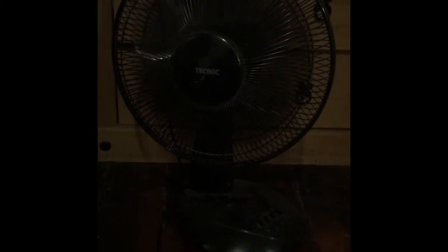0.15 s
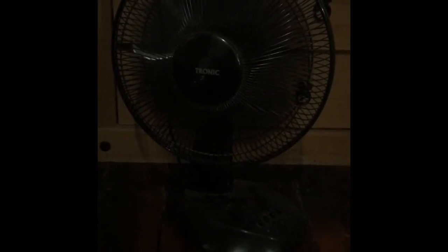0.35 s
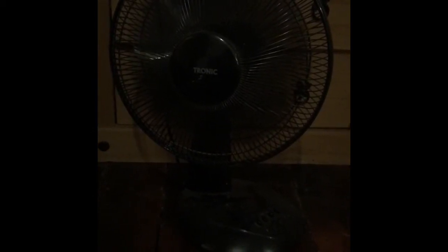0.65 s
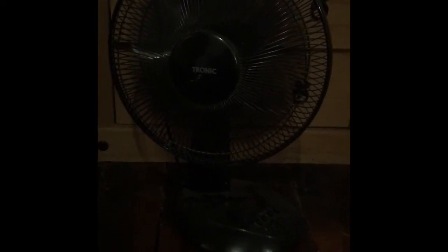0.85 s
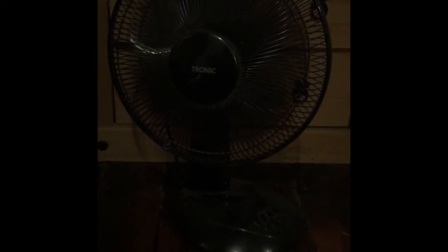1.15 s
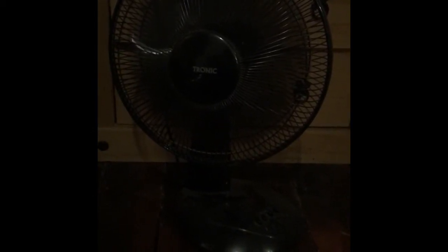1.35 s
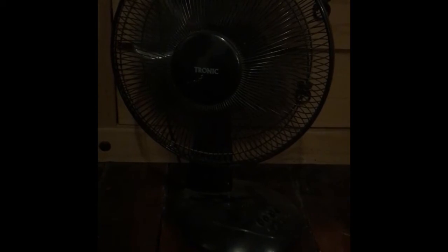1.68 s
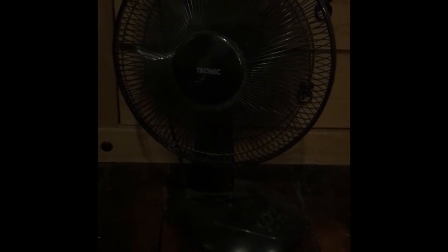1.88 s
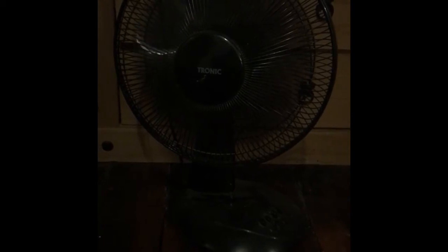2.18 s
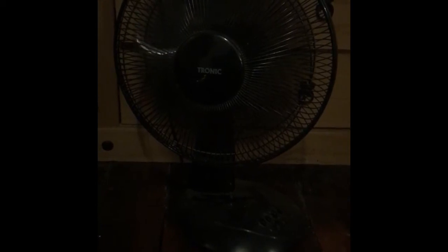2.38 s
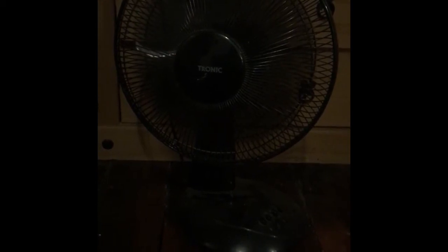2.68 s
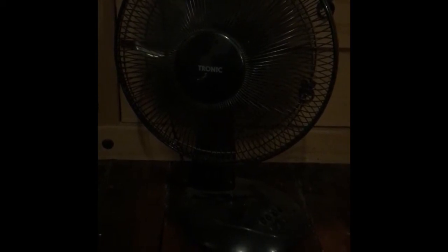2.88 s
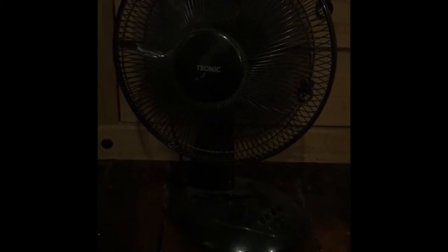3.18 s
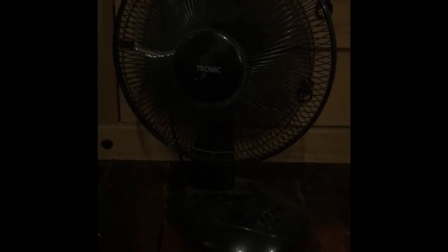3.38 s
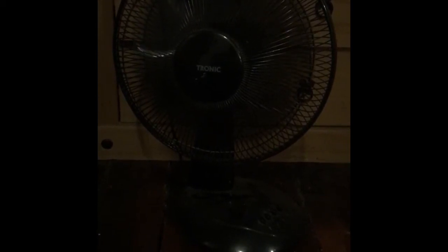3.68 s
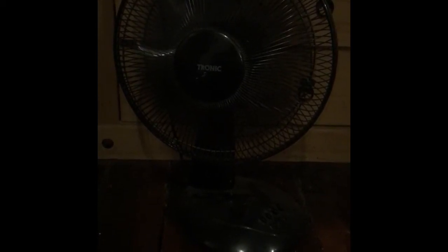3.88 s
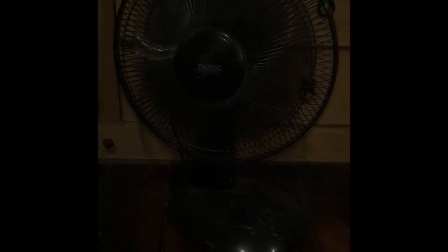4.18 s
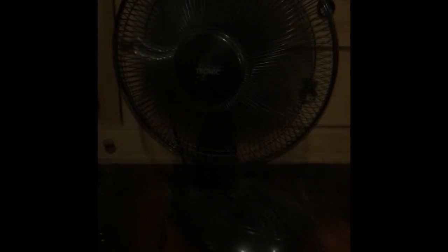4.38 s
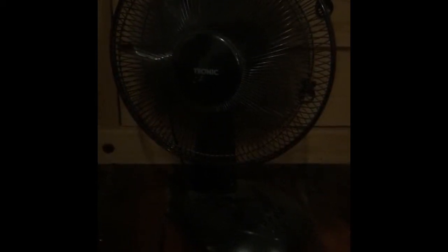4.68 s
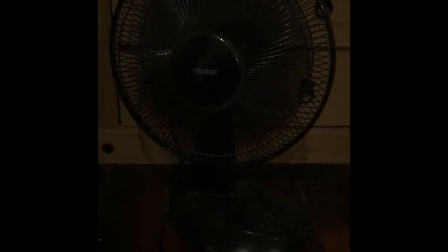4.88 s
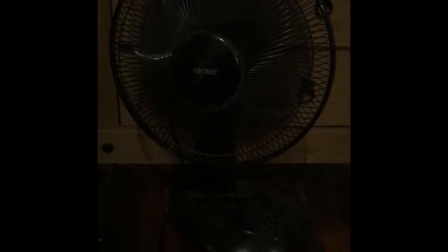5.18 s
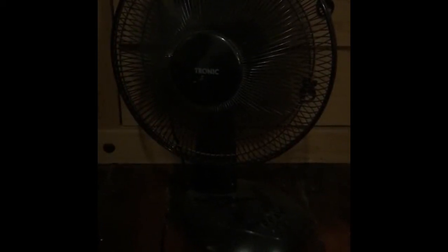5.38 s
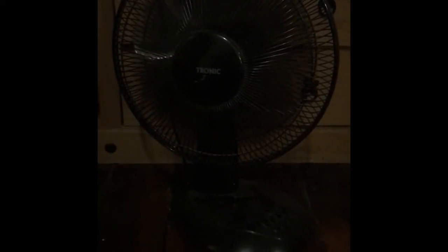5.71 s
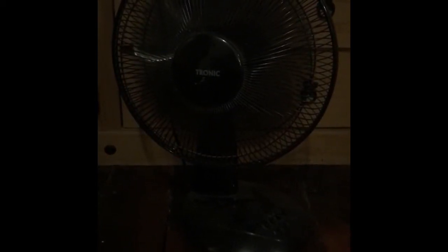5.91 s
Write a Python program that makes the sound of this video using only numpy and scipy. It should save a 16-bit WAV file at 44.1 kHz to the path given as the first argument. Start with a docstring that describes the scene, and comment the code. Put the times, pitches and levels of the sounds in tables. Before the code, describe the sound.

Low wind buffeting with irregular dull thuds dominates a faint steady fan hum and airy whir, with a brief soft rasp past midway.

```python
"""An electric desk fan runs in a quiet room, blowing at the microphone: thumps, rumble, motor hum, blade drone.
Eddies are short pressure swings with noisy fronts and sharp suction pulses; rumble is noise shaped by gusts.
Blades and motor are wavering tones plus a throbbing swish; the grille is a resonant band of noise.
Past midway something rasps faintly, as grainy noise in high resonances, with soft hollow rubs.
Behind lie microphone hiss, a thin electronic whine of harmonics, and tiny ticks of enveloped noise."""
import sys
import numpy as np
from scipy import signal
from scipy.fft import rfft, irfft, next_fast_len
from scipy.io import wavfile
from scipy.ndimage import uniform_filter1d, map_coordinates

SR = 44100
rng = np.random.default_rng(int(sys.argv[2]) if len(sys.argv) > 2 else 0)


def store_wav(level_fs):
    """Save 16-bit WAV to argv[1]."""
    pcm = np.round(np.clip(np.atleast_2d(level_fs), -1, 1) * 32767)
    wavfile.write(sys.argv[1], SR, pcm.T.astype(np.int16))


N = 266805
TIME = np.arange(N) / SR
SHAFT_HZ = 14.5

# how strongly the fan sounds towards the microphone: (time [s], relative level [dB])
FACING = [(0, -58), (0.6, -59.5), (1.3, -60), (1.7, -59), (2.3, -59), (2.9, -60), (3.4, -59.5), (3.9, -59),
          (4.25, -63.5), (4.75, -58.5), (5.5, -58.5), (6.05, -59.5)]


def amp(db):
    """Decibels to gain."""
    return 10 ** (np.asarray(db) / 20)


def unit(x):
    """Scales to rms 1."""
    return x / np.sqrt(np.mean(x ** 2) + 1e-20)


def curve(rows):
    """Interpolates a (time [s], value) table at every sample."""
    return np.interp(TIME, *np.transpose(rows))


def noise(spectrum):
    """Noise of rms 1, shaped by a (frequency [Hz], relative density [dB]) table."""
    table_hz, table_db = np.transpose(spectrum)
    bin_hz = np.fft.rfftfreq(N, 1 / SR)
    shape = amp(np.interp(np.log(bin_hz + 1), np.log(table_hz), table_db))
    return unit(irfft(rfft(rng.standard_normal(N)) * shape, N))


def wander(rate_hz):
    """Smooth random curve of rms 1 with rate_hz random knots a second."""
    knots = rng.standard_normal(2048)
    coarse_s = TIME[::64]
    coarse = map_coordinates(knots, [coarse_s * rate_hz], order=3, mode="wrap")
    return unit(np.interp(TIME, coarse_s, coarse))


def bump(centre_s, length_s):
    """Gaussian swell of height 1; length_s is its full width at 1/e."""
    return np.exp(-np.minimum((2 * (TIME - centre_s) / length_s) ** 2, 100))


def steadied(x, share):
    """Divides a noise by its own envelope raised to share, evening out chance swells."""
    envelope = abs(signal.hilbert(x, next_fast_len(N))[:N])
    swell = uniform_filter1d(envelope, size=600)
    return unit(x / (swell + 1e-6) ** share)


def ringing(hz, width_hz):
    """Noise of rms 1 through the same resonance twice."""
    b, a = signal.iirpeak(hz, hz / width_hz / 2, SR)
    once = signal.lfilter(b, a, rng.standard_normal(N))
    return unit(signal.lfilter(b, a, once))


def tone(hz, waver_db, drift_rad):
    """Steady tone whose level and phase waver slightly."""
    phase = 2 * np.pi * (hz * TIME + rng.random()) + drift_rad * wander(rate_hz=4.13)
    return np.sqrt(2) * amp(waver_db * wander(rate_hz=2.864)) * np.sin(phase)


def eddies(swing_db=0.8, swirl_db=3.5, core_db=7):
    """Each eddy hits with fine swirl and sharp core suction, then swings the pressure, slower in its wake."""
    # strong eddies striking the microphone: (time [s], relative swing level [dB],
    # swing frequency [Hz], length [cycles], relative level of front swirl and core [dB])
    strikes = [(0.193, -24.5, 72.7, 0.75, -44), (0.382, -26, 92.9, 0.52, -36),
               (0.436, -20.5, 131, 1.43, -37), (0.554, -36, 89.2, 1.7, -41.5), (0.621, -24, 89.9, 1.3, -40),
               (0.694, -20, 73.9, 2.4, -33.5), (0.902, -27, 74.4, 2.8, -36.5), (0.936, -20.5, 67, 1.3, -55),
               (0.983, -19, 57, 1.35, -41), (1.061, -25, 69.1, 1.2, -47.5),
               (1.207, -11.5, 204.9, 2.03, -19.5), (1.224, -9.5, 60.5, 1.35, -46),
               (1.426, -22, 93.75, 0.59, -40.5), (1.56, -24.5, 78.7, 2, -60),
               (1.828, -33, 188.5, 1.4, -37.5), (1.872, -19, 144.4, 1.03, -36),
               (1.925, -24.5, 93, 2.3, -37), (2.111, -29.5, 64.2, 1.6, -51),
               (2.264, -30, 184.9, 5.6, -30.5), (2.282, -17, 162.3, 1.6, -33),
               (2.32, -19.5, 68, 2.6, -30.5), (2.39, -23.5, 79.4, 1.6, -60), (2.614, -22.5, 66, 1.3, -49.5),
               (2.714, -27, 85, 1.6, -39), (2.752, -20, 69.2, 3.7, -33), (2.825, -20.5, 63.3, 1.3, -63),
               (3.032, -22.5, 129, 1.83, -41), (3.245, -17.5, 61.4, 1.6, -46),
               (3.343, -17.5, 180, 2.2, -29), (3.444, -22, 74, 1.7, -38.5),
               (3.508, -19.5, 93.5, 0.89, -39.5), (3.556, -31, 134.4, 5.2, -31),
               (3.726, -26, 63.9, 1.1, -49), (3.84, -32, 62, 5.2, -45.5), (3.937, -30, 109.7, 5.3, -43.5),
               (4.02, -25.5, 68.5, 2.1, -46), (4.248, -25, 66.4, 1, -57), (4.304, -25.5, 72.8, 2, -43.5),
               (4.371, -21.5, 81.9, 1.9, -49), (4.522, -31, 73.9, 1.7, -62), (4.834, -19.5, 64.5, 1.6, -43),
               (4.885, -29, 150.2, 1.9, -37), (5.083, -29.5, 182.8, 4.6, -34), (5.108, -16, 79.1, 1.3, -40),
               (5.252, -27, 57.4, 1.9, -67), (5.282, -14, 78.1, 0.47, -37), (5.506, -23, 81.4, 2.1, -37.5),
               (5.534, -19.5, 60.06, 4.1, -38), (5.574, -19, 88.15, 3.3, -31),
               (5.813, -17.5, 65.6, 2.25, -38.5), (5.844, -19, 158.5, 1.3, -28.5),
               (5.885, -23, 69.3, 2.4, -45.5), (5.995, -23, 63.3, 1.2, -47)]
    # fine swirl inside an eddy: (frequency [Hz], relative density [dB])
    swirl_spectrum = [(60, -19.5), (160, 16), (260, 3), (400, -10), (600, -16.5), (900, -27), (1500, -36),
                      (3000, -93)]
    rise, fall = 0.36, 0.7  # envelope widths before and after the strike, relative to length
    slowing, wobble = 0.3, 0.159  # in log frequency
    swirl_length_s, lead_cycles, core_s = 0.021, 0.23, 0.0014
    swings, fronts, cores = np.zeros((3, N))
    unsteady = np.exp(wobble * wander(rate_hz=220))
    start_cycles = rng.random(len(strikes))
    for (s, db, hz, length, front_db), start in zip(strikes, start_cycles):
        near = slice(max(int((s - 0.1) * SR), 0), int((s + 0.1) * SR))
        t = TIME[near] - s
        cycles = t * hz
        swing_hz = hz * np.exp(-slowing * np.tanh(cycles)) * unsteady[near]
        width = length * np.where(t < 0, rise, fall)
        shape = np.exp(1 - np.hypot(1, 2 * cycles / width))
        swings[near] += amp(db) * shape * np.sin(2 * np.pi * (np.cumsum(swing_hz) / SR + start))
        from_front_s = t + lead_cycles / hz  # the swirl peaks ahead of the strike
        fronts[near] += amp(front_db) * np.exp(-(2 * from_front_s / swirl_length_s) ** 2)
        across = (t / core_s) ** 2  # squared distance from the vortex centre, in core radii
        cores[near] -= amp(front_db) * (1 - across) / (1 + across) ** 2
    swirl = fronts * steadied(noise(swirl_spectrum), share=0.72)
    return amp(swing_db) * swings + amp(swirl_db) * swirl + amp(core_db) * cores


def gusts():
    """Air-stream strength: powers of a wavering calm draught and of gusts that rise fast, slacken and die."""
    # gusts of the draught: (start [s], length [s], relative level [dB])
    gust_rows = [(0.158, 0.062, -31), (0.361, 0.092, -29), (0.538, 0.21, -35.5), (0.89, 0.14, -34),
                 (1.183, 0.14, -33), (1.402, 0.23, -34.5), (1.749, 0.22, -34.5), (2.234, 0.1, -29.5),
                 (2.364, 0.13, -37.5), (2.623, 0.24, -33.5), (3.013, 0.1, -33.5), (3.218, 0.17, -34),
                 (3.488, 0.074, -32), (3.663, 0.078, -33.5), (4.004, 0.049, -33.5), (4.153, 0.23, -38.5),
                 (4.498, 0.18, -41.5), (4.81, 0.11, -29.5), (5.057, 0.15, -35), (5.251, 0.046, -27.5),
                 (5.414, 0.31, -36.5), (5.761, 0.16, -30.5)]
    rise_s, fall_s, slack_db_per_s = 0.014, 0.028, 11.5
    calm_db, calm_waver_db = -48, 1
    power = amp(calm_db + calm_waver_db * wander(rate_hz=15)) ** 2
    for s, length_s, db in gust_rows:
        t = np.maximum(TIME - s, 0)
        rise = np.minimum(t / rise_s, 1)
        fall = np.exp(-np.clip((t - length_s) / fall_s, 0, 100))
        power = power + (rise * amp(db - slack_db_per_s * t) * fall) ** 2
    return np.sqrt(power)


def draught(level_db=0.5, flutter_db=-12, lump_db=4):
    """Low rumble that follows the air stream, with a lumpy flutter of small swirls."""
    # rumble of the draught: (frequency [Hz], relative density [dB])
    rumble_spectrum = [(15, -37), (27, -18), (42, 3.5), (60, 3.5), (100, -2.5), (150, -14.5), (260, -25),
                       (400, -33), (700, -72), (1500, -82)]
    # small swirls fluttering in it: (frequency [Hz], relative density [dB])
    flutter_spectrum = [(60, -13), (150, 7), (240, -3.5), (400, -13.5), (600, -46), (1500, -54)]
    rumble = steadied(noise(rumble_spectrum), share=0.12)
    lumps = unit(amp(lump_db * wander(rate_hz=45)))
    flutter = noise(flutter_spectrum) * lumps
    return gusts() * (amp(level_db) * rumble + amp(flutter_db) * flutter)


def blades(level_db=2.5, throb=0.074, flicker_db=0.37):
    """Three blades drone as they pass, and their broad swish throbs a little at the same rate."""
    # air torn by blades and grille: (frequency [Hz], relative density [dB])
    swish_spectrum = [(30, 5), (130, -2), (220, 0.5), (360, 4.5), (480, -4), (680, 3), (820, -0.5),
                      (1080, 2.5), (1550, -3), (1780, -8), (2150, -9), (2350, -12.5), (3000, -15.5),
                      (4800, -25), (9000, -58)]
    # drone of the passing blades: (multiple of blade rate, level [dB])
    drone_rows = [(1, -52.5), (2, -54.5), (5, -66)]
    passing_hz = 3 * SHAFT_HZ
    throbbing = 1 + throb * np.sin(2 * np.pi * passing_hz * TIME)
    level = amp(level_db + curve(FACING) + flicker_db * wander(rate_hz=17))
    swish = level * throbbing * noise(swish_spectrum)
    drone = sum(amp(db) * tone(round(k) * passing_hz, waver_db=2.5, drift_rad=0.41)
                for k, db in drone_rows)
    return swish + drone


def motor(hum_db=-1, sideband_db=-9):
    """Deep hum beats once a shaft turn with its sideband; higher tones follow the fan's facing."""
    # deep hum, near a multiple of the 100 Hz magnetic pull: (time [s], relative level [dB])
    hum_rows = [(0, -58), (1, -59), (2, -57.5), (3, -58.5), (3.7, -60.5), (4.1, -63.5), (4.42, -75.5),
                (4.7, -58), (5.3, -59), (6.05, -60.5)]
    # multiples of the pull, sidebands at shaft-rate spacing: (frequency [Hz], mean level [dB])
    tone_rows = [(900.5, -75), (1000.5, -78), (1100.6, -69), (1200.7, -80), (1386.4, -79), (1400.9, -75),
                 (1415.4, -73), (1515.6, -76), (1530.1, -79), (1601, -84), (1615.6, -82), (1686.6, -84),
                 (1730.2, -88), (1886.7, -82), (1901.2, -86), (1930.4, -85), (2086.7, -85), (2115.8, -87),
                 (2130.5, -83), (2216, -83), (2936.5, -87)]
    hum_hz = 400.3
    hum = tone(hum_hz, waver_db=-1.3, drift_rad=0.31)
    sideband = tone(hum_hz + SHAFT_HZ, waver_db=4.5, drift_rad=0.097)
    facing_db = curve(FACING)
    tones = sum(amp(db) * tone(hz, waver_db=2.0, drift_rad=0.19) for hz, db in tone_rows)
    beating = hum + amp(sideband_db) * sideband
    return amp(hum_db + curve(hum_rows)) * beating + amp(facing_db - facing_db.mean()) * tones


def grille(hz=3000, width_hz=380):
    """Air shed from the grille wires whistles faintly in one broad band."""
    # airy whistle: (time [s], level [dB])
    whistle_rows = [(0, -80.5), (2, -78.5), (3.5, -80.5), (4.2, -80.5), (4.7, -78), (5.5, -76.5),
                    (6.05, -88)]
    return amp(curve(whistle_rows)) * ringing(hz, width_hz)


def stroke(start_s, dying_s, attack_s=0.018):
    """Envelope of one rasp: a linear catch times a near-exponential decay."""
    t = np.maximum(TIME - start_s, 0)
    return np.minimum(t / attack_s, 1) * np.exp(-np.minimum((t / dying_s) ** 1.15, 100))


def rasp(grain_db=-1.5):
    """Grainy friction rings a few high resonances over a dry hiss."""
    # strokes: (start [s], dying time [s], relative squeak level [dB], relative hiss level [dB])
    stroke_rows = [(3.529, 0.12, -62.5, -70), (3.615, 0.055, -55.5, -55), (3.988, 0.13, -68, -70.5),
                   (4.085, 0.017, -58, -64), (4.23, .03, -74, -83), (4.347, 0.024, -65, -68),
                   (4.415, 0.021, -63, -89)]
    # resonances of the squeak: (frequency [Hz], width [Hz], relative level [dB])
    modes = [(4680, 50, 0), (11120, 50, -3), (11920, 130, 1)]
    # dry hiss: (frequency [Hz], relative density [dB])
    hiss_spectrum = [(3800, -18), (4700, -0.5), (5300, -9), (6200, 1), (6900, -1), (7800, -19),
                     (10500, -15), (11900, -19), (13000, -16), (16000, -22)]
    squeak = unit(sum(amp(db + grain_db * wander(rate_hz=71)) * ringing(hz, width_hz)
                      for hz, width_hz, db in modes))
    hiss = noise(hiss_spectrum) * unit(amp(grain_db * wander(rate_hz=180)))
    return sum(stroke(s, dying_s) * (amp(squeak_db) * squeak + amp(hiss_db) * hiss)
               for s, dying_s, squeak_db, hiss_db in stroke_rows)


def rubs(width_hz=130, brush_db=-6):
    """Soft rubs near the rasp's start: a hollow noise resonance under a dull brushing noise."""
    # rubs: (centre [s], length [s], level of the ring [dB], ring frequency [Hz])
    rub_rows = [(3.589, 0.081, -51, 553), (3.63, 0.084, -62, 950)]
    brush = noise([(300, -8), (600, 4), (1050, 2), (1500, 3), (2000, -7), (3500, -18), (8000, -50)])
    return sum(amp(db) * bump(s, length_s) * (ringing(hz, width_hz) + amp(brush_db) * brush)
               for s, length_s, db, hz in rub_rows)


def ticks(length_s=0.0011):
    """Small dry ticks: very short, bright snaps of noise."""
    # ticks: (time [s], level [dB])
    tick_rows = [(2.765, -60), (5.856, -62), (6.009, -45)]
    snap = noise([(1000, -10), (2800, 9), (4000, 2), (7000, 9), (15000, -15)])
    return snap * sum(amp(db) * bump(s, length_s) for s, db in tick_rows)


def hiss_burst(level_db=-67):
    """A faint burst of high hiss, about 1.2 to 1.28 s."""
    burst = curve([(1.2, 0.13), (1.215, 1), (1.27, 1), (1.285, 0)])  # a trace of it stands before
    return amp(level_db) * burst * noise([(2500, -3), (6000, -4), (9000, -3), (16000, -16.5)])


def electronics(hiss_db=-70, tick_db=-57, higher_db=-83):
    """Microphone hiss with electrical interference: a harmonic whine with gaps, and tiny regular ticks."""
    # whine: (multiple of base pitch, relative level [dB])
    whine_rows = [(4, -89), (5, -95), (6, -86), (7, -79), (8, -79), (9, -88)]
    # microphone hiss: (frequency [Hz], relative density [dB])
    hiss_spectrum = [(1000, 2.5), (4900, -6), (5600, 1.5), (6700, 0.5), (7800, -3), (9700, 2.5),
                     (10400, -4), (11500, 2.5), (16000, 4.5)]
    # runs of regular whine gaps: (first gap [s], end of run [s])
    gap_runs = [(.477, 3.1), (4.712, 6.05)]
    # brief sag of everything here: (time [s], gain [dB])
    sag_rows = [(0, 1), (3.9, 1), (4.15, 0), (4.45, -1.5), (4.7, 1), (6.05, 1)]
    whine_hz, drift_rad = 1580.3, 0.25
    gap_every_s, gap_s = 0.64, 0.028
    higher_from_s, higher_to_s, higher_hz = 3.685, 3.93, 13950  # one tone replaces the whine
    tick_from_s, tick_to_s, tick_every_s = 0.305, 4.1, 0.3072

    phase = 2 * np.pi * whine_hz * TIME + drift_rad * wander(rate_hz=7.3)
    whine = sum(np.sqrt(2) * amp(db) * np.sin(k * phase) for k, db in whine_rows)
    gaps = sum(abs(TIME - s) < gap_s / 2 for run in gap_runs for s in np.arange(*run, gap_every_s))
    replaced = 1.0 * ((TIME > higher_from_s) & (TIME < higher_to_s))
    switched = uniform_filter1d(replaced, size=100)  # softened edges
    on = uniform_filter1d(1.0 - gaps, size=100) - switched
    higher = amp(higher_db) * switched * np.sqrt(2) * np.sin(2 * np.pi * higher_hz * TIME)
    beats = sum(bump(s, 0.0012) for s in np.arange(tick_from_s, tick_to_s, tick_every_s))
    tick = noise([(4000, -11), (7000, -9), (9500, -5.5), (12000, -5.0), (16000, -9)])
    hiss = amp(hiss_db) * noise(hiss_spectrum)
    return amp(curve(sag_rows)) * (hiss + on * whine + higher + amp(tick_db) * beats * tick)


def scene():
    """Air on the microphone, the fan's own sound, rasp, rubs and small dry ticks, hiss and electronics."""
    air = eddies() + draught()
    fan = blades() + grille() + motor()
    small_sounds = rasp() + rubs() + ticks()
    return (air + fan + small_sounds + hiss_burst() + electronics())[None]


def record(dry, low_cut_hz=26, top_hz=15800):
    """The microphone sheds the deepest bass; a steep low-pass then limits the band."""
    high_pass = signal.butter(2, low_cut_hz, "high", fs=SR, output="sos")
    thinned = signal.sosfiltfilt(high_pass, dry)
    low_pass = signal.firwin(1023, top_hz, window=("kaiser", 9), fs=SR)
    return signal.oaconvolve(thinned, low_pass[None], "same")


dry = scene()
out = record(dry)
store_wav(out)
```